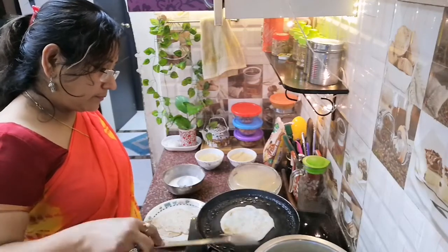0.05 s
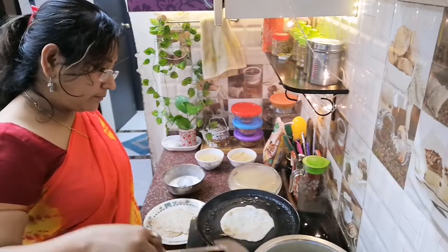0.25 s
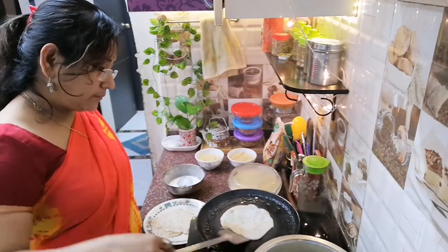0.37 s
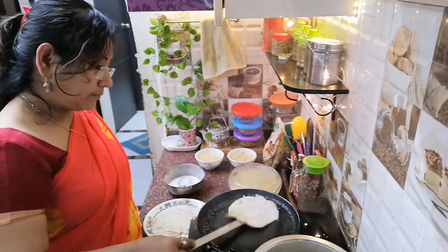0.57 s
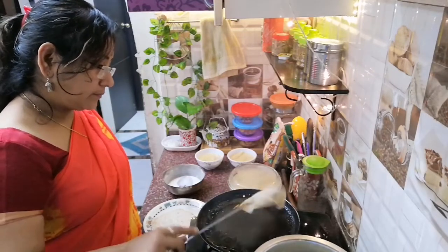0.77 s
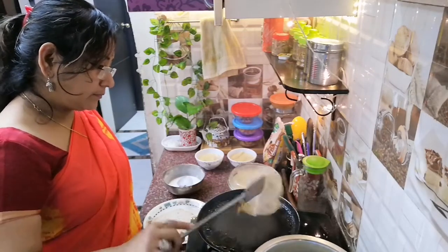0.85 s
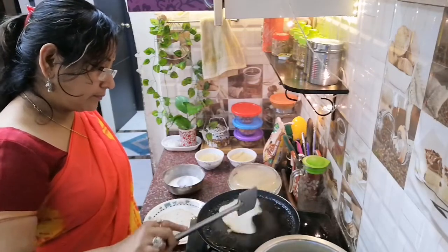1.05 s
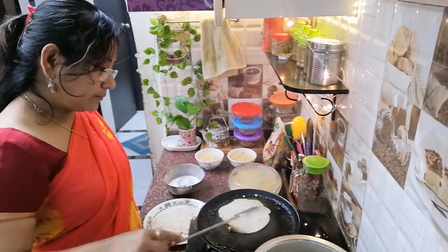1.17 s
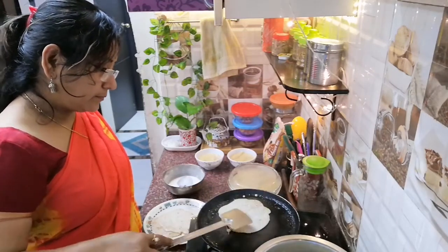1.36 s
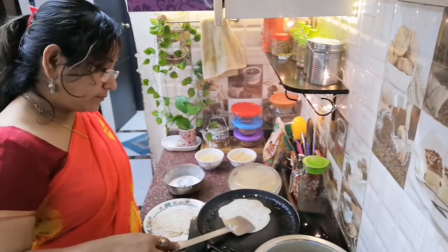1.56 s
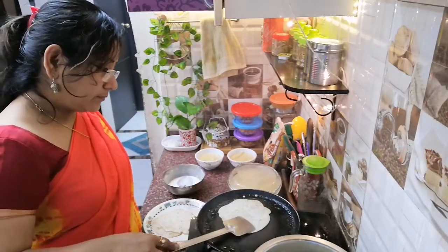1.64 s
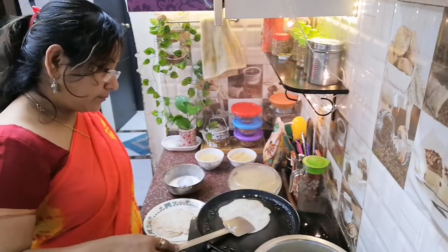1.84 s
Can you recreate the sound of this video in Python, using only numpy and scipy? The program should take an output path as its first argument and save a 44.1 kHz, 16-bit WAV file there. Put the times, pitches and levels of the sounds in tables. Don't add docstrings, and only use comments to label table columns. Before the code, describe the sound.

A wooden spatula clacks sharply on a pan rim, scrapes with a short squeak under a pancake, fat sizzles, the pancake slaps down wetly, then soft pats follow; small tiled kitchen, close stereo phone microphones.

```python
import sys
import numpy as np
from scipy import signal
from scipy.fft import rfft, irfft
from scipy.io import wavfile
from scipy.ndimage import uniform_filter1d, map_coordinates

SR = 44100
rng = np.random.default_rng(int(sys.argv[2]) if len(sys.argv) > 2 else 0)


def store_pcm(level_fs):
    pcm = np.round(np.clip(level_fs, -1, 1) * 32767).astype(np.int16)
    wavfile.write(sys.argv[1], SR, np.atleast_2d(pcm).T)


def undo_db(level):
    steps = np.asarray(level, float) / 20
    return 10 ** steps


N = 85995

# t/s, level/dB
FRYING = [
    (0.0, -56),
    (0.244, -58),
    (0.482, -46.5),
    (0.798, -61),
    (1.95, -54.5),
]
# f/Hz, level/dB
FRY_SPECTRUM = [(500, -1.5), (1500, -6), (3000, -1), (4200, -3), (6500, -2.5), (10000, -5.5), (15000, -9)]
# t/s, level/dB, wet mid spatter/dB
FLARES = [
    [(0.556, -66, 8), (0.572, -50.5, 1.5), (0.62, -50, 2.5), (0.684, -47.5, -1), (0.72, -60, -12),
     (0.8, -90, 3)],
    [(1.04, -62, -16), (1.066, -57, 8.5), (1.08, -48, -0.5), (1.145, -51, -6), (1.19, -56.5, -5),
     (1.22, -61, 0), (1.256, -55.5, 2), (1.29, -70, -0.5), (1.34, -67, 4.5)],
    [(1.53, -82, 11), (1.565, -70, 11), (1.58, -54.5, 0.5), (1.62, -56, 3.5), (1.734, -60.5, -8),
     (1.758, -58, -4), (1.8, -59, 8), (1.822, -98, 3), (1.95, -87, 2)],
]
# f/Hz, level/dB
FLARE_SPECTRUM = [(400, -22.5), (1000, -7.5), (1700, -10), (3200, 1), (4200, -4), (6500, -3.5), (10000, -6),
                  (15000, -8)]
PATCHES = (3300, 4350, 6350, 8200, 12000)
# t/s, level/dB
SWELL = [(0.0, -56.5), (0.238, -57.5), (0.266, -75), (0.608, -58.5), (0.646, -63), (0.912, -56.5),
         (1.096, -60.5), (1.856, -57.5), (1.95, -61)]
# f/Hz, level/dB
HUM_SPECTRUM = [(25, -5), (48, 0), (66, -13), (95, -8.5), (145, -12.5), (200, -17.5), (450, -21),
                (1500, -42)]
# t/s, peak level/dB
TICKS = [
    (0.2174, -42),
    (0.2412, -31),
    (1.543, -35),
    (1.5485, -35),
]
# t/s, peak level/dB, brightness/(dB per octave)
KNOCKS = [
    (.2438, -20, 12),
    (.246, -15, 4.5),
    (.2495, -10.5, 2.5),
    (.2523, -11, 0.5),
    (.2555, -20, -3),
]
# f/Hz, level/dB, t60/s
PAN_MODES = [(292, -26, 0.12), (450, -24, 0.096), (605, -4.5, 0.068), (631, 4, 0.096), (832, 1, 0.085),
             (2677, 9, 0.034), (3600, 5, 0.071), (3550, 5, 0.04), (5050, 5, 0.057), (5620, 3, 0.088),
             (5790, -8, 0.08), (6440, -12, 0.06), (8310, 4.5, 0.038), (9000, -11, .09)]
# f/Hz, level/dB
CRACK_SPECTRUM = [(220, -41), (420, -17), (1500, -15), (2600, -15), (4300, -7.5), (5600, -8.5), (9000, -10),
                  (15000, -18.5)]
# f/Hz, level/dB, t60/s
CLACK_MODES = [(290, -45, 0.094), (432, -34, 0.1), (851, -40, 0.031), (2696, -21.5, 0.01),
               (3627, -27, 0.058)]
# t/s, squeal level/dB, chatter level/dB, dry rub level/dB, blade body level/dB
SLIDES = [
    [(0.27, -57.5, 2, 10, 2), (0.32, -61.5, 8, 7.5, 14), (0.36, -49, -3, -0.5, -15),
     (0.395, -46.5, 1, -1, 4), (0.436, -44, 8, 1, 0), (0.462, -47.5, 13, 7.5, 5),
     (0.516, -36, -13, -5.5, 0), (0.565, -46.5, -8, -5.5, 7), (0.62, -64, 4, 5, -3)],
    [(1.56, -71, -7, 6, -13), (1.592, -57.5, -6, 11, 7), (1.66, -57, -20, 9.5, -1), (1.72, -58, 4, 9, 9.5),
     (1.748, -57.5, -21, 11, 13), (1.764, -63.5, 7, 8, 7), (1.876, -61, 4, 12, 9), (1.94, -73, 5, 10.5, 3)],
]
# f/Hz, width/Hz, level/dB
SQUEAL = [(2060, 63, 2), (2135, 120, 1.5), (2223, 72, 4), (2380, 86, -7), (2750, 150, -9.5)]
# f/Hz, width/Hz, level/dB
BODY = [(927, 125, -7.5), (1046, 150, -2), (1183, 52, -15)]
# f/Hz, width/Hz, level/dB
CHATTER = [(3264, 30, -13), (3420, 300, -6.5), (4950, 120, -23), (5460, 50, -16)]
# f/Hz, level/dB
RUB_SPECTRUM = [(300, -57), (1000, -13), (2500, 4.5), (4200, -5), (6000, -3.5), (10000, -55), (15000, -46)]
# t/s, pitch ratio
GLIDE = [(0.33, 0.94), (0.389, 1.045), (0.442, 0.99), (0.484, 1.015), (0.57, 0.99)]
# t/s, length/s, level/dB, f/Hz, width/Hz
WHISTLES = [(0.305, .022, -52, 630, 60), (0.345, .022, -51, 612, 60), (0.37, .014, -58, 475, 60),
            (0.30, .015, -60, 265, 80), (0.41, .035, -58, 640, 50), (0.665, .011, -50, 6620, 300),
            (0.665, .016, -55, 1200, 150), (0.63, .012, -54, 3300, 500), (1.102, .008, -55, 720, 200),
            (1.122, .008, -61, 900, 200), (1.155, .01, -61, 1050, 200), (1.068, .007, -53, 3250, 500),
            (0.478, .015, -53, 5900, 500), (0.345, .05, -58, 8750, 160), (0.365, .025, -53, 2170, 130),
            (0.397, .008, -50, 2200, 150), (1.55, .008, -59, 8600, 700), (1.679, .004, -56, 5400, 900)]
# t/s, peak level/dB
LANDING = [
    (1.078, -23),
    (1.082, -33),
    (1.088, -40),
    (1.1025, -34),
]
# t/s, peak level/dB, brightness/(dB per octave), bounce level/dB
PATS = [
    (1.658, -32.5, 8, 0),
    (1.741, -36, 4, -1),
    (1.814, -36.5, 6, -4),
    (1.868, -42.5, -13, -9),
]
# f/Hz, level/dB, t60/s
PAT_MODES = [(342, -11, 0.025), (470, -3.5, 0.084), (570, -1.5, 0.054), (714, -13, 0.051), (902, -15, .03),
             (1071, 6.5, .07), (1206, -1, 0.067), (1560, 0.5, 0.042), (2200, -14, .05)]
# f/Hz, width/Hz, lift/dB, gain/dB, treble tilt/(dB per octave)
PORTS = [
    (8550, 1300, 7.5, -4.5, 0),
    (6270, 2050, 1.5, 0.5, -0.5),
]


def unit(x):
    return x / np.sqrt(np.mean(x ** 2, axis=-1, keepdims=True))


def colour(x, spectrum):
    f, db = np.array(spectrum, float).T
    log_hz = np.log(np.arange(N // 2 + 1) * SR / N + 1)
    gain = undo_db(np.interp(log_hz, np.log(f), db, right=db[-1]))
    return irfft(rfft(x) * gain, N)


def peak(x, hz, width):
    return signal.lfilter(*signal.iirpeak(hz, hz / width, SR), x)


def double_peak(x, hz, width):
    return peak(peak(x, hz, width), hz, width)


def ring(x, hz, t60):
    pole = np.exp((2j * np.pi * hz - np.log(1000) / t60) / SR)
    mode = signal.lfilter([1], [1, -pole], x)
    phase = 2j * rng.standard_normal() * min(hz / 2000, 1)
    return (mode * np.exp([[phase], [0]])).imag


def strike(at_s, modes, tilt_db, mid_hz):
    push = np.exp(-((np.arange(N) / SR - at_s) * mid_hz * 12) ** 2)
    push = push / push.sum()
    out = 0
    for hz, db, t60 in modes:
        out = out + undo_db(db + tilt_db * np.log2(hz / mid_hz)) * ring(push, hz, t60)
    return signal.lfilter(*signal.butter(4, 230, "high", fs=SR), out)


def burst(at_s, t60):
    t = np.arange(N) / SR - at_s
    return (t >= 0) * np.exp(-np.log(1000) * np.maximum(t, 0) / t60)


def walk(rate):
    k = int(SR / rate)
    return unit(uniform_filter1d(uniform_filter1d(rng.standard_normal(N), k), k))


def curve(tables, col=1):
    t = np.arange(N) / SR
    out = np.full(N, -200.)
    for rows in tables:
        rows = np.array(rows, float)
        out = np.maximum(out, np.interp(t, rows[:, 0], rows[:, col], -200, -200))
    return out


def pair():
    a, b = rng.standard_normal((2, N))
    share = 0.091
    return np.array([a, share * a + np.sqrt(1 - share ** 2) * b])


def grains(per_s, spread_db):
    happens = rng.random(N) < per_s / SR
    size = undo_db(spread_db * rng.exponential(size=N))
    return unit(happens * pair() * size)


def sizzle():
    pops_per_s, spread_db = 20000, 1.2
    bed = unit(colour(grains(pops_per_s, spread_db), FRY_SPECTRUM))
    bed = bed * undo_db(curve([FRYING]) + walk(26) - 0.5)
    spit = unit(colour(grains(pops_per_s, spread_db), FLARE_SPECTRUM))
    spit = spit + sum((undo_db(2.5 * walk(13)) - 1) * peak(spit, hz, hz / 6) for hz in PATCHES)
    wet_gain = undo_db(curve(FLARES, col=2).clip(-20, 20))
    spit = spit + (wet_gain - 1) * (peak(spit, 3060, 1800) + peak(spit, 1200, 800))
    left_right_db = [[2.5], [0]]
    return bed * undo_db(left_right_db) + spit * undo_db(curve(FLARES) + 1.5 * walk(55) + 9)


def rumble():
    mid, side = colour(rng.standard_normal((2, N)), HUM_SPECTRUM)
    side = signal.lfilter(*signal.butter(1, 260, "high", fs=SR), side)
    hum = np.array([mid + side, undo_db(-1.5) * (mid - side)]) / np.std(mid)
    settle_s, settle_length_s = 1.4, 0.063
    bump = np.exp(-((np.arange(N) / SR - settle_s) / settle_length_s) ** 2)
    settle = undo_db(-56) * bump * unit(peak(rng.standard_normal(N), 285.4, 160))
    return undo_db(curve([SWELL]) + 4.0) * hum + settle


def knock():
    crack = unit(colour(pair(), CRACK_SPECTRUM))
    out = strike(KNOCKS[0][0], CLACK_MODES, 0, 2800)
    for at, db, tilt_db in KNOCKS:
        out = out + undo_db(db - 26.5) * strike(at, PAN_MODES, tilt_db, 3800)
        out = out + undo_db(db - 14) * crack * burst(at, 0.024)
    for at, db in TICKS:
        out = out + undo_db(db - 16.5) * burst(at, 0.067) * crack
    last_s, last_db, _ = KNOCKS[-1]
    shake = undo_db(last_db - 22) * burst(last_s, 0.73)
    loose = grains(1500, 1.2)
    rattle = unit(sum(undo_db(db) * ring(loose, hz, t60) for hz, db, t60 in PAN_MODES[5:]))
    return out + shake * (rattle + undo_db(1.5) * crack)


def bend(x):
    at, ratio = np.array(GLIDE).T
    place = np.cumsum(np.interp(np.arange(N) / SR, at, ratio))
    place += at[0] * SR - place[int(at[0] * SR)]
    place -= (np.arange(N) > SR) * (place[SR] - SR)
    return np.array([map_coordinates(v, [place], mode="mirror") for v in x])


def slide():
    rub = grains(9000, 1.4) * undo_db(walk(50))

    def sing(table):
        out = 0
        for hz, width, db in table:
            out = out + undo_db(db + 1.7 * walk(5)) * unit(peak(peak(rub, hz, 3 * width), hz, width))
        return out

    fast_db, dry_db, body_db = (curve(SLIDES, col=k).clip(-30, 30) for k in (2, 3, 4))
    tone = bend(sing(SQUEAL) + undo_db(body_db) * sing(BODY))
    chatter = undo_db(fast_db) * sing(CHATTER)
    dry_rub = undo_db(13.5 + dry_db) * colour(rub, RUB_SPECTRUM)
    return undo_db(curve(SLIDES) - 6.0) * (tone + chatter + dry_rub)


def whistles():
    t, out = np.arange(N) / SR, 0
    for at, length, db, hz, width in WHISTLES:
        swell = np.exp(-((t - at) / length) ** 2)
        puff = unit(swell * double_peak(pair(), hz, width))
        out = out + undo_db(db + 2.6) * np.sqrt(np.mean(swell ** 2)) * puff
    return out


def landing():
    envelope = sum(undo_db(db - 9) * burst(at, 0.02) for at, db in LANDING)
    slap = envelope * unit(colour(pair(), FLARE_SPECTRUM))
    pan = undo_db(8) * peak(slap, 3640, 140) + undo_db(7.5) * peak(slap, 5430, 450)
    return slap + pan + undo_db(11.5) * peak(slap, 600, 500)


def pats():
    damp = unit(peak(peak(pair(), 810, 920), 740, 760))
    bounce_s, out = 0.017, 0
    for at, db, tilt_db, again_db in PATS:
        hit = strike(at, PAT_MODES, tilt_db, 970)
        bounce = undo_db(again_db) * strike(at + bounce_s, PAT_MODES[:5], 0, 700)
        squeeze = undo_db(db - 8) * damp * burst(at, 0.15)
        out = out + undo_db(db - 12) * (hit + bounce) + squeeze
    return out


def kitchen(x):
    t60_s, tail_db, alike_hz = 0.26, -8.5, 422
    t = np.arange(int(.4 * SR)) / SR
    tail = pair()[:, :len(t)] * np.exp(-np.log(1000) * t / t60_s) * (t > .004)
    wet = signal.fftconvolve(x, tail / np.linalg.norm(tail[0]), axes=1)[:, :N]
    low = signal.lfilter(*signal.butter(1, alike_hz, fs=SR), x)
    return low[1] + x - low + undo_db(tail_db) * wet


def scene():
    return kitchen(sizzle() + knock() + slide() + whistles() + landing() + pats()) + rumble()


def band_limit(x):
    return signal.sosfilt(signal.butter(12, 16290, fs=SR, output="sos"), x)


def record(dry):
    out = []
    for x, (hz, width, lift_db, gain_db, tilt_db) in zip(dry, PORTS):
        lifted = x + undo_db(lift_db) * double_peak(x, hz, 1.29 * width)
        response = [(3400, -0.5), (4250, -4.5), (4900, 1.5), (16000, 3 * tilt_db)]
        out.append(undo_db(gain_db) * colour(lifted, response))
    out = signal.sosfilt(signal.ellip(8, .2, 60, 15500, fs=SR, output="sos"), out)
    out = signal.lfilter(*signal.butter(4, 40, "high", fs=SR), out)
    return band_limit(out)


dry = scene()
out = record(dry)
store_pcm(out)
```